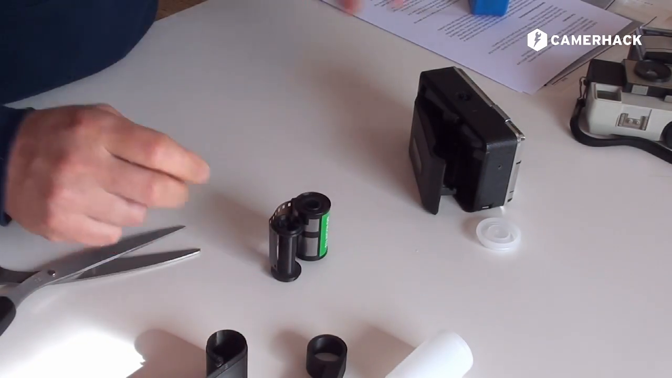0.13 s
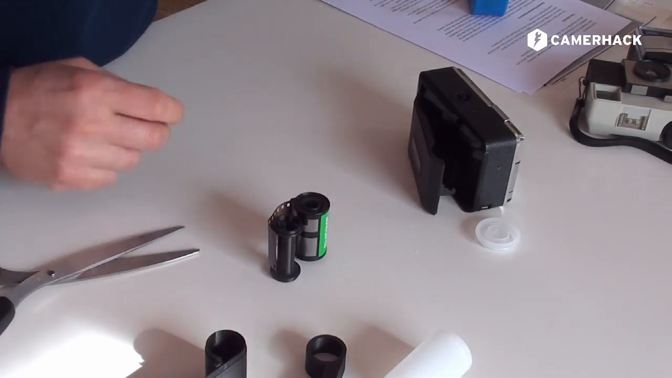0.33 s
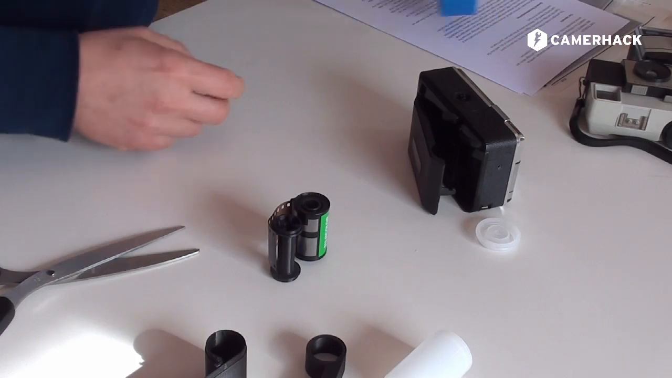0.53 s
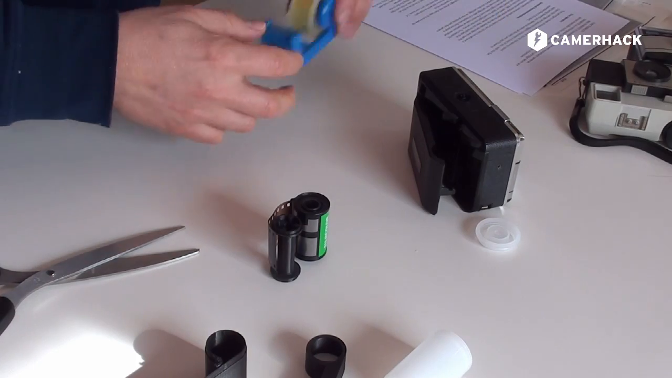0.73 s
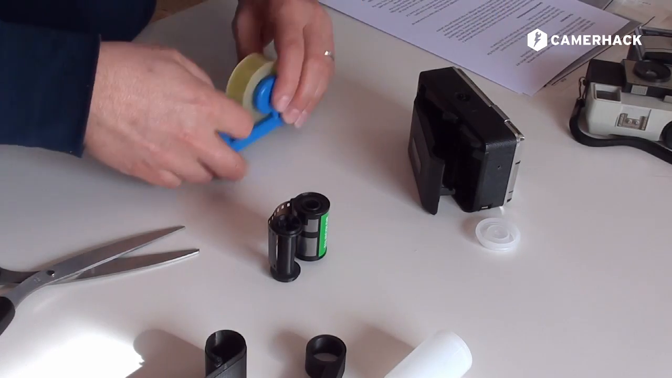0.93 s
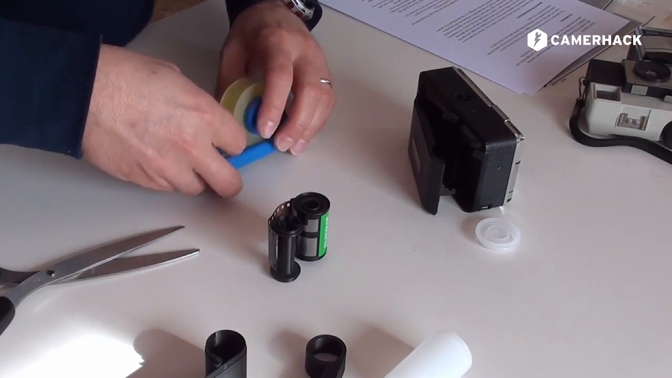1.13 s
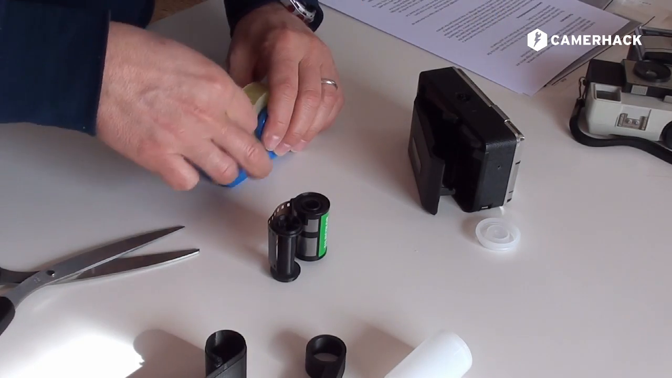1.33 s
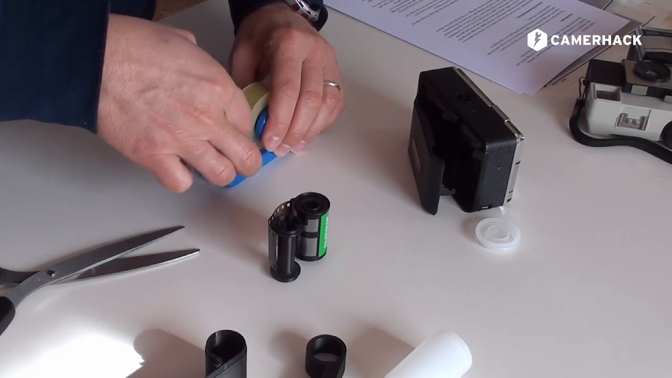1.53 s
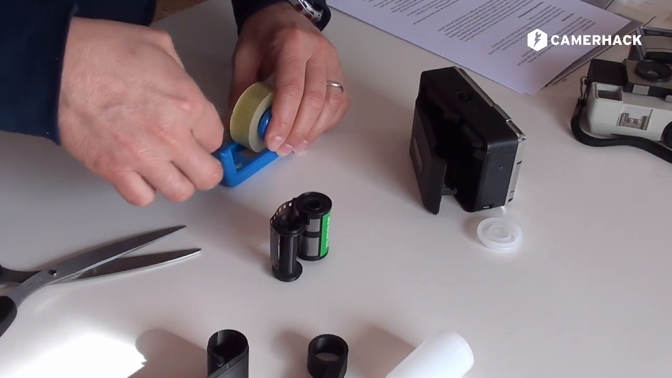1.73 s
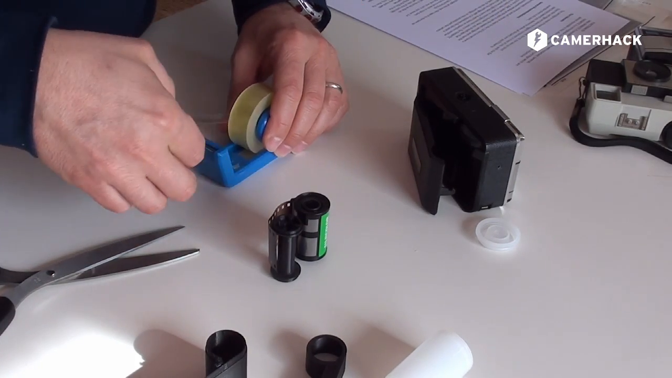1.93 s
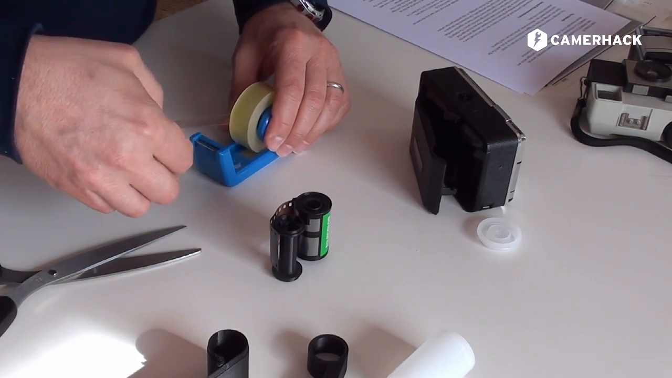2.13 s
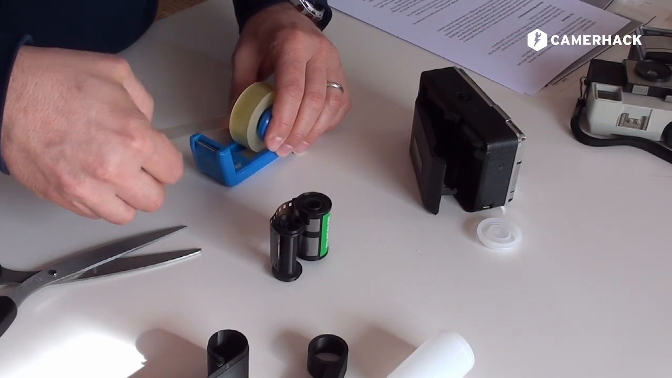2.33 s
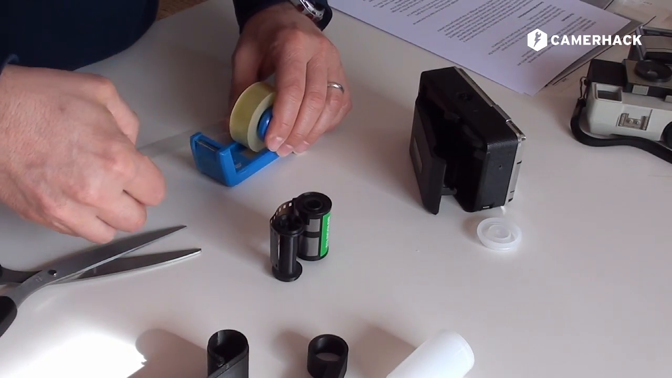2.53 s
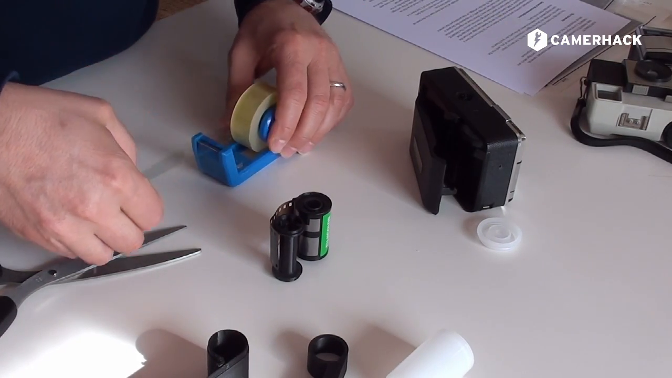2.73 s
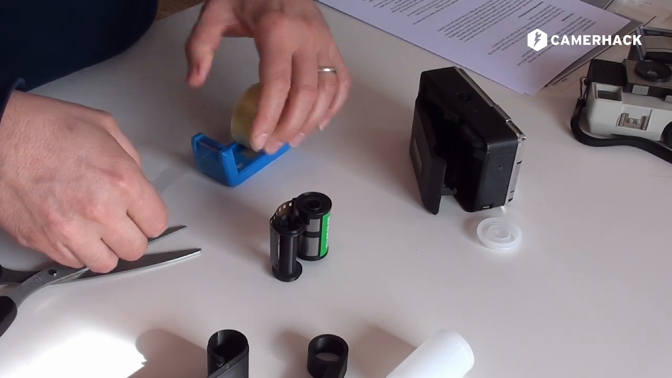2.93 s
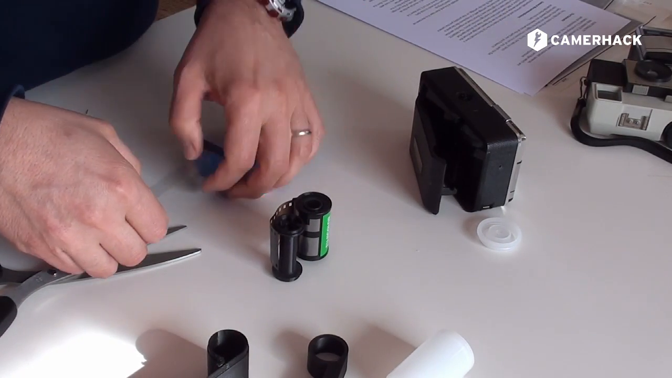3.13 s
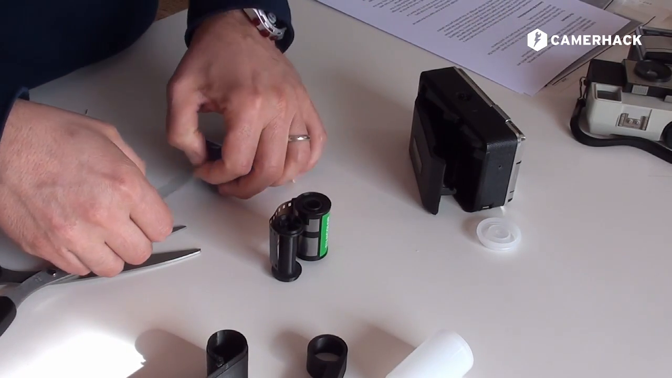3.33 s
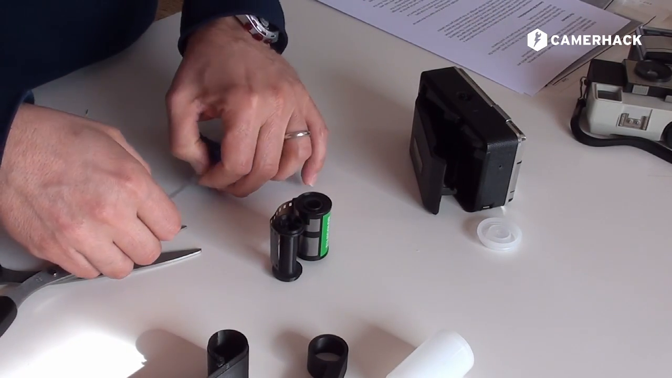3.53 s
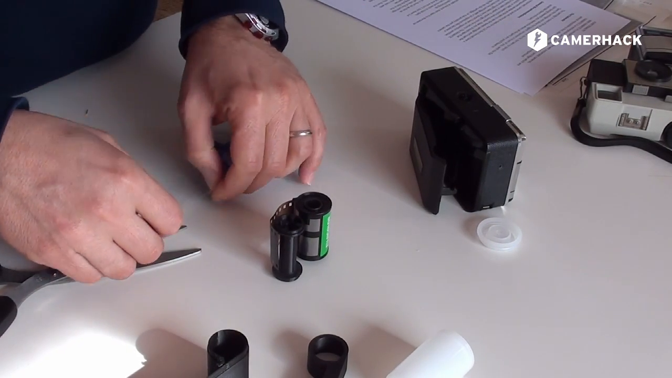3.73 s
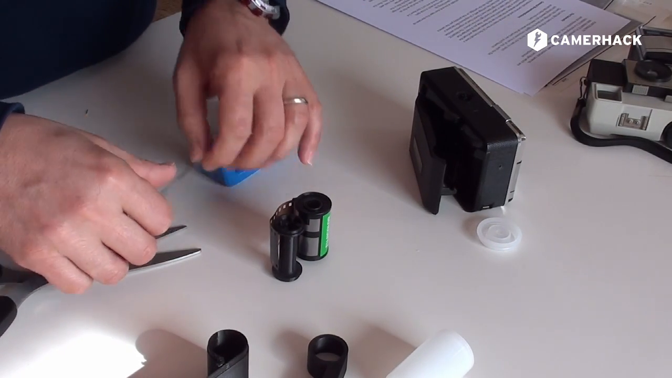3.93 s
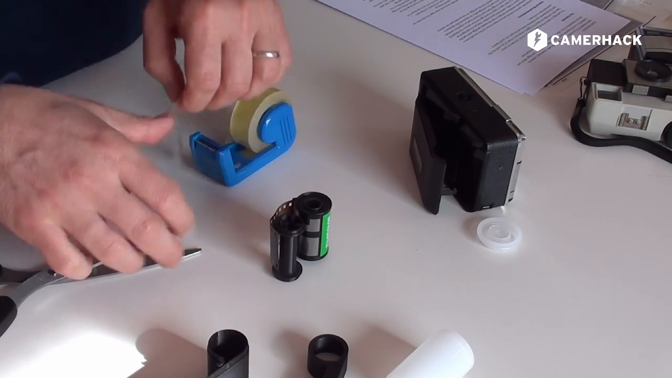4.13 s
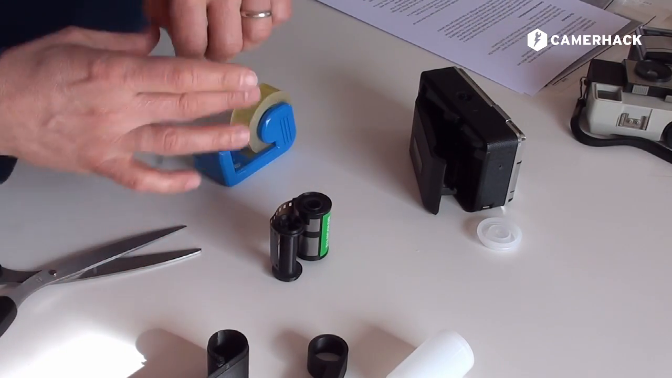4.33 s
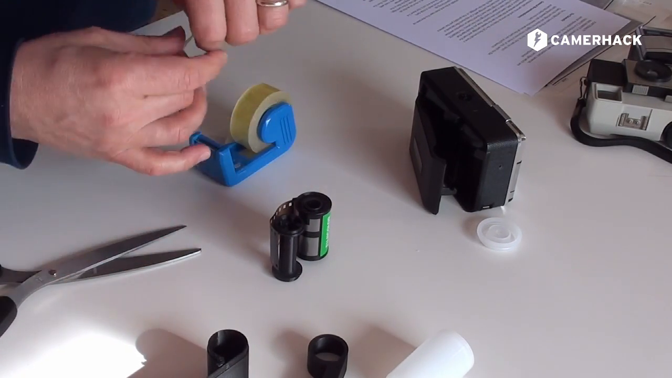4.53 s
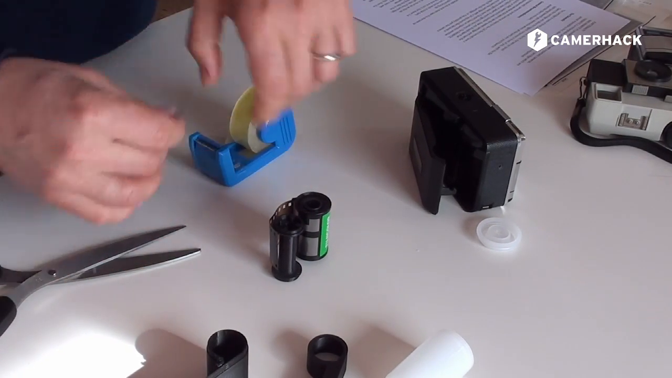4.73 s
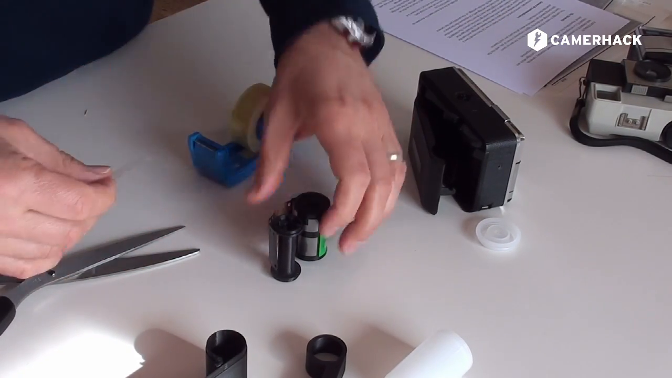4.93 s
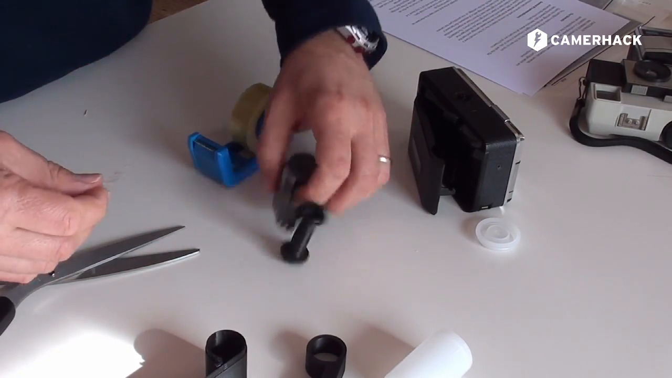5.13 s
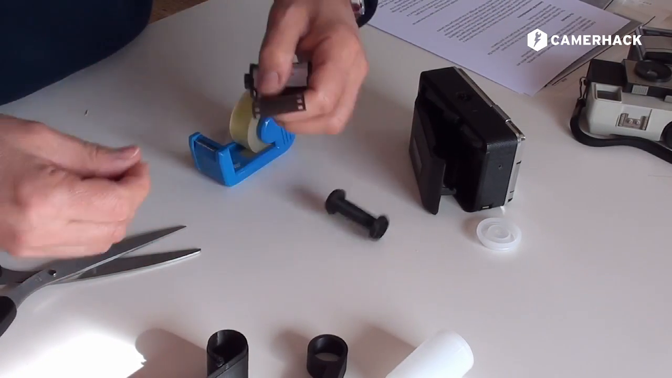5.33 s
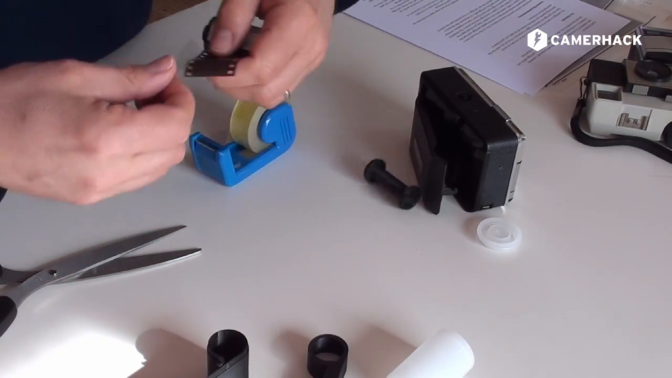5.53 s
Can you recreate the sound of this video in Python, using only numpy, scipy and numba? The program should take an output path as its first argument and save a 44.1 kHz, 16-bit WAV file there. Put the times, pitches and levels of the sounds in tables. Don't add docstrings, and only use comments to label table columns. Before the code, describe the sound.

Sticky tape is peeled from a small plastic dispenser in a bright, stuttering rasp, torn sharply, then a hollow plastic spool clatters onto the desk.

```python
import sys
import numpy as np
from scipy import signal
from scipy.fft import rfft, irfft
from scipy.io import wavfile
from numba import njit

SR = 44100
rng = np.random.default_rng(int(sys.argv[2]) if len(sys.argv) > 2 else 0)


def field_ratio(decibels):
    return 10 ** (np.asarray(decibels, dtype=float) / 20)


def output_pcm(signal):
    pcm = np.clip(np.atleast_2d(signal).T, -1, 1) * 32767
    wavfile.write(sys.argv[1], SR, np.round(pcm).astype(np.int16))


N = 246519
TIME = np.arange(N) / SR


@njit
def svf(x, hz, width):
    y, band, low = np.empty(len(x)), 0., 0.
    for i in range(len(x)):
        g, k = np.tan(np.pi * hz[i] / SR), width / hz[i]
        v = (band + g * (x[i] - low)) / (1 + g * (g + k))
        band, low, y[i] = 2 * v - band, low + 2 * g * v, k * v
    return y


def body(x, resonances, shift=1):
    out, power = 0, 0
    for k, (hz, width_hz, db) in enumerate(resonances):
        centre_hz = np.clip(hz * shift * np.ones(len(x)), 20, SR / 2.3)
        out = out + (-1) ** k * field_ratio(db) * svf(x + 1e-18, centre_hz, 1. * width_hz)
        power += field_ratio(db) ** 2 * np.pi * width_hz / SR
    return out / np.sqrt(power)


def crackle(count, scatter_db):
    excess = np.minimum(rng.exponential(size=count), 4)
    x = rng.standard_normal(count) * field_ratio(scatter_db * excess)
    return x / np.sqrt(np.mean(x ** 2))


def burst(hold_ms, fade_ms, scatter_db, count=512):
    t_ms = np.arange(count) / SR * 1000
    fade = np.exp(-np.maximum(t_ms - max(hold_ms, 0), 0) / fade_ms)
    rise = 1 - np.exp(-t_ms / 0.3)
    size = np.abs(crackle(count, scatter_db)) * fade * rise
    x = size * np.sign(rng.standard_normal(count))
    for _ in range(12):
        spectrum = rfft(x)
        flat = irfft(spectrum / (np.abs(spectrum) + 1e-12))
        x = size * np.sign(flat)
    return x


def add(track, s, piece):
    i = int(s * SR)
    track[i:i + len(piece)] += piece[:N - i]


def curves(at, rows):
    s, *columns = np.transpose(rows)
    return [np.interp(at, s, c) for c in columns]


def high_pass(x, order, hz):
    return signal.sosfilt(signal.butter(order, hz, "high", fs=SR, output="sos"), x)


# (frequency [Hz], density [dB per Hz])
FLOOR_COLOUR = [(15, -54), (25, -8), (80, -5), (190, 3.5), (240, -1), (516, -2), (1300, -6), (16000, -12.5)]


def floor():
    hz = np.fft.rfftfreq(N, 1 / SR) + 1
    table_hz, table_db = np.transpose(FLOOR_COLOUR)
    colour_db = np.interp(np.log(hz), np.log(table_hz), table_db)
    hiss = irfft(rfft(rng.standard_normal(N)) * field_ratio(colour_db), N)
    return hiss * field_ratio(-45.5) / np.sqrt(np.mean(hiss ** 2))


# (frequency [Hz], decay t60 [s], level [dB])
ROOM = [(127, 0.35, -34), (279, 0.62, 11.5), (564, 0.49, 8.5), (1010, 0.55, 6.5), (1870, 0.52, 10),
        (4000, 0.5, 10.5), (7800, 0.34, 1.5), (12000, 0.3, 1.5)]


def room(x):
    t = TIME[:SR]
    tail = 0
    table_hz, table_t60_s, table_db = np.transpose(ROOM)
    for hz in 127 * 2 ** np.arange(0, 7.1, .5):
        t60_s = np.interp(np.log(hz), np.log(table_hz), table_t60_s)
        db = np.interp(np.log(hz), np.log(table_hz), table_db) - 5.0
        decay = np.exp(-np.log(1000) * t / t60_s)
        band = body(crackle(len(t), 2.52), [(hz, 0.47 * hz, 0)]) * decay
        tail = tail + field_ratio(db) * np.sqrt(hz / t60_s / SR) * band
    early = 1 + 0.35 * np.exp(-t / 0.0032)
    arrival = np.clip((t - .001) / .002, 0, 1)
    return signal.fftconvolve(x, tail * early * arrival * np.sqrt(20 / SR))[:N]


def swell(s, db, rise_s, fall_s):
    slope = np.where(TIME < s, (s - TIME) / max(rise_s, .002), (TIME - s) / max(fall_s, .002))
    return field_ratio(db - 30 * slope)


# (peak time [s], level [dB], rise [s], fall [s], centre [Hz])
SLIDES = [(.442, -18.5, 0.029, 0.12, 1420), (.99, -30, 0.14, 0.015, 970), (1.17, -28.5, 0.095, 0.45, 685),
          (1.33, -27, 0.08, 0.017, 1140), (2.778, -30, 0.021, 0.18, 830), (3.138, -28.5, 0.028, 0.31, 795),
          (4.125, -43.5, 0.86, 0.091, 2600), (4.664, -35, 0.014, 0.082, 1760),
          (4.706, -33.5, 0.006, 0.078, 2370), (5.024, -21.5, 0.014, 0.13, 690),
          (5.06, -32, 0.044, 0.072, 790), (5.108, -15, 0.042, 0.028, 790), (5.126, -21, 0.049, 0.028, 1200)]
# (peak time [s], level [dB], rise [s], fall [s])
STROKES = [(0.442, -21.5, 0.069, 0.2), (.89, -34.5, .05, 0.48), (.995, -47, .2, .01), (1.122, -39, .01, .2),
           (1.33, -12, 0.13, 0.013), (1.36, -11.5, 0.033, 0.19), (5.217, -24, 0.042, 0.036),
           (2.835, -25.5, 0.066, 0.015), (3.146, -34, 0.082, 0.35), (3.75, -34.5, 0.53, 0.17),
           (3.99, -44, .1, 0.3), (4.137, -26.5, 0.36, 0.033), (4.698, -24, 0.064, 0.015),
           (4.708, -20, 0.006, 0.088), (5.128, -32, 0.16, .02)]
# (multiple of centre [ratio], width [Hz], level [dB])
SLIDE_COLOUR = [(1.01, 606, -2), (1.8, 860, -16)]
# (frequency [Hz], width [Hz], level [dB])
STROKE_COLOUR = [(5730, 1600, 9.9), (7800, 1240, 14), (11000, 16000, 2.2)]


def rubs():
    centre_hz = curves(TIME, SLIDES)[-1]
    slide_gain = sum(swell(*row[:-1]) for row in SLIDES)
    stroke_gain = sum(swell(*row) for row in STROKES)
    slides = slide_gain * body(crackle(N, 2.7), SLIDE_COLOUR, centre_hz)
    strokes = stroke_gain * body(crackle(N, 1.7), STROKE_COLOUR)
    return field_ratio(-7.5) * slides + field_ratio(-8.5) * strokes


# (time [s], level [dB], colour [Hz], length [ms])
TICKS = [(0.4443, -11, 3830, 5), (.9607, 3, 8050, 0.47), (0.972, -6, 7800, 0.78), (1.238, -7.5, 4500, 1.7),
         (1.256, -2.5, 3730, 1.2), (1.2547, -3, 9750, 2.5), (1.315, -2, 9000, 0.87),
         (1.3479, -6, 8000, 1.7), (1.353, 1, 9000, 5.6), (1.3108, -12, 7500, 2.2), (1.2959, -4, 7550, 1.2),
         (1.3193, 7, 7460, 1.7), (1.3284, 3, 7250, 0.57), (1.3377, 15.5, 8700, 3),
         (1.3917, 13.5, 6300, 0.6), (1.408, 2, 7300, 1.6), (1.3843, 6, 8600, 2), (1.2855, -12, 7500, 1.5),
         (1.272, -12, 11000, 2), (2.822, -22, 6000, 1.2), (3.142, -10.5, 8260, 2.2),
         (3.185, -12, 6740, 1.6), (3.3273, -8, 6340, 0.58), (3.16, -16, 7300, 1.4), (3.35, 5.5, 5300, 1.4),
         (3.356, 4, 5300, 1), (3.357, 12, 8600, 2), (3.4007, 13.5, 8000, 0.76), (3.4124, 6.5, 5300, 0.75),
         (3.4176, 20, 7950, 0.85), (3.897, -16.5, 7970, 2.1), (4.106, -2, 7700, 1), (4.13, 17, 8400, 0.32),
         (4.6657, -21, 7000, 2), (4.6711, -1.5, 8400, 1.4), (4.6787, -7, 7500, 1), (4.701, 1, 5100, 1.86),
         (4.702, -11.5, 2310, 3.2), (4.7035, 7, 9000, 3.4), (5.0891, -11, 8140, 3), (5.125, -10, 9000, 3),
         (5.1704, 0, 9050, 1.1), (5.1735, -7, 10500, 2.5), (5.1775, 7.5, 8360, 0.79),
         (5.185, 1.5, 6900, 1.2)]
# (time [s], level [dB])
CRINKLES = [(.643, -8.5), (5.105, -16), (5.131, -3), (3.311, -7), (3.827, -11), (3.9614, -6), (3.979, -4),
            (3.991, -3), (3.995, -2), (4.0075, -11), (4.0775, -11), (4.363, -11.5), (4.5203, -19)]
# (time [s], level [dB])
TAPS = [(.404, -8), (0.4342, -2), (0.4645, -11), (0.4676, -4.5), (0.4966, -3), (.699, -17.5),
        (0.9054, -19.5), (1.1152, -15.5), (1.243, -6), (5.121, -32), (5.128, -27), (1.3375, 9.5),
        (3.2133, -16), (3.3497, 0), (4.7006, -30)]
# (time [s], level [dB], length [ms])
SQUEAK = (5.022, -28.5, 28)
# (frequency [Hz], width [Hz], level [dB])
SQUEAK_TONES = [(2800, 260, 0), (7000, 500, -17), (8600, 500, -14), (11200, 500, -15)]


def dull_tap(crack):
    return -body(crack, [(1760, 2050, 0)])


def click(crack):
    return np.linalg.norm(crack) * (np.arange(len(crack)) == 0)


def ticks():
    near, far = np.zeros(N), np.zeros(N)
    fade_ms, scatter_db = .4, 0.3
    crinkles = [(s, db, 6300, 0.35) for s, db in CRINKLES]
    for s, db, hz, ms in TICKS + crinkles:
        crack = burst(ms, fade_ms, scatter_db)
        for track, x in (near, crack), (far, click(crack)):
            snap = body(x, [(hz, 0.42 * hz, 0), (8000, 6500, -8)])
            add(track, s, field_ratio(db - 11.5) * (snap + field_ratio(-23) * dull_tap(x)))
    for s, db in TAPS:
        crack = burst(3.46, fade_ms, scatter_db)
        add(near, s, field_ratio(db - 19.5) * dull_tap(crack))
        add(far, s, field_ratio(db - 12.0) * dull_tap(click(crack)))
    s, db, ms = SQUEAK
    squeak = field_ratio(db) * body(burst(ms, 0.6, 0.46, count=2048), SQUEAK_TONES)
    add(near, s, squeak)
    add(far, s, squeak)
    return near, far


# (time [s], body level [dB], pitch [ratio])
BOUNCES = [(5.246, 14, 1.01), (5.2539, -13, 1.04), (5.266, 5, .97), (5.274, 7.5, .96), (5.287, 8, 1.03),
           (5.297, 6, 1.08), (5.3467, 16, .94), (5.367, 6, 1.06), (5.394, 12, 1.01), (5.435, 10, .97),
           (5.455, 14, 1.03), (5.466, -9, 1.05), (5.4953, 11.5, .96), (5.517, 6, 1.02), (5.522, 11, 1.04),
           (5.5515, 9.5, .98), (5.584, 7, 1.01)]
# (time [s], level [dB])
RIM = [(5.2459, 3.5), (5.2553, -12), (5.2626, -15), (5.272, -1), (5.2871, -21), (5.345, -15), (5.3673, 1),
       (5.3837, -7), (5.3928, -3), (5.435, -4), (5.455, 3.5), (5.4625, -7), (5.4946, -17), (5.5156, -3),
       (5.521, -21), (5.536, -18), (5.551, -1.5), (5.5673, -13), (5.5843, -4)]
# (time [s], level [dB])
ROLL = [
    (5.244, -36),
    (5.246, -2.5),
    (5.3, -5.5),
    (5.345, -12),
    (5.45, -12.5),
    (5.59, -14.5),
]
# (frequency [Hz], width [Hz], level [dB])
SPOOL = [(420, 1700, -6.5), (905, 250, 6), (1280, 610, -1), (1780, 460, 4.5), (2290, 610, -0.4),
         (3100, 1350, -1), (3940, 1220, -3.5), (5300, 1400, -14.5)]
# (frequency [Hz], width [Hz], level [dB])
SPOOL_EDGE = [(7400, 1800, 5), (9000, 400, 3), (11000, 700, 1), (12500, 4100, -14)]


def spool():
    roll_s, roll_db = np.transpose(ROLL)
    roll_gain = field_ratio(np.interp(TIME, roll_s, roll_db, left=-200, right=-200))
    blows, rim = field_ratio(-2.5) * roll_gain * crackle(N, 1.1), np.zeros(N)
    for s, db, _ in BOUNCES:
        add(blows, s, field_ratio(db - 5.5) * burst(1.3, 1.4, 0.092))
    for s, db in RIM:
        add(rim, s, field_ratio(db - 3.0) * burst(0.2, 0.73, 0.35))
    pitch = curves(TIME, BOUNCES)[-1]
    hollow = body(body(blows, SPOOL, pitch), [(1780, 12900, 0)])
    hiss = body(blows, [(7700, 2300, 0)])
    return field_ratio(-2.0) * hollow + body(rim, SPOOL_EDGE) + field_ratio(-21.0) * hiss


def desk(s, db, modes):
    out, push = 0, np.hanning(max(int(SR / 1000), 3))
    uneven_db = 2.5 * rng.standard_normal((len(modes), len(s)))
    for (hz, mode_db, t60_s), chance_db in zip(modes, uneven_db):
        train = np.zeros(N)
        np.add.at(train, (s * SR).astype(int), field_ratio(db + mode_db + chance_db))
        pole = np.exp(2j * np.pi * hz / SR - np.log(1000) / (t60_s * SR))
        out = out + signal.lfilter([1], [1, -pole], train).imag
    return signal.lfilter(push / push.sum(), [1], out)


# (time [s], main modes [dB], lowest modes [dB], upper modes [dB])
KNOCKS = [(0.403, -24.5, -27, -27), (0.905, -62, -56, -37), (0.971, -30, -34, -30.5),
          (1.115, -18.5, -21, -11), (1.149, -21, -39, -22), (1.183, -31, -16, -33), (1.205, -6, -53, -15.5),
          (1.316, -18, -49, -17.5), (1.39, -20.5, -19.5, -20), (2.777, -24, -43, -24.5),
          (2.799, -37, -28, -31), (3.144, -27, -27, -20), (3.162, -26, -53, -24), (3.183, -28, -56, -23),
          (3.213, -20, -13.5, -19.5), (3.349, -21.5, -27, -18), (3.414, -19, -40, -16.5),
          (3.46, -43, -14, -34), (3.478, -10.5, -15.5, -18), (3.49, -11.5, -14, -20),
          (3.574, -4.5, -40, -9), (3.609, -49, -14.5, -24.5), (3.74, -27, -36, -25.5),
          (3.803, -31, -44, -31), (3.927, -31.5, -20.5, -28), (3.958, -52, -21, -42),
          (4.067, -60, -27.5, -57), (4.702, -48, -62, -41), (5.039, -29.5, -57, -20.5),
          (5.074, -45, -48, -32), (5.104, -27, -32, -27), (5.123, -33, -27.5, -21.5)]
# (time [s], middle modes [dB], upper modes [dB])
GRIP = [(1.5, -11, -11.5), (1.6, 8.5, -13.5), (1.73, -2.5, -9), (1.85, -4.5, -11.5), (2.02, -4.5, -9),
        (2.15, -4.5, -11), (2.3, -7.7, -13), (2.55, 5, -11.5), (3.5, 4.5, -9), (5.3, 11.5, -12)]
# (frequency [Hz], level [dB], decay t60 [s])
DESK_LOW = [(119, -16.5, 0.17), (162, -30, 0.44), (170.5, -15, 0.41), (185.3, -28, 0.6)]
# (frequency [Hz], level [dB], decay t60 [s])
DESK_MID = [(253.7, -29, 0.47), (275.6, -13.5, 0.24), (312.3, -13, 0.16)]
# (frequency [Hz], level [dB], decay t60 [s])
DESK_MAIN = [(380.6, -7, 0.12), (401.7, -13, 0.12), (398, -24.5, .06)]
# (frequency [Hz], width [Hz], level [dB])
DESK_TOP = [(607, 260, 11.5), (713, 80, 15.5), (860, 138, 6.5), (1180, 173, 7.5), (1440, 320, 4),
            (2050, 700, -8.5)]


def thumps(slip_s, slip_jolt_db):
    bounce_s, bounce_db, _ = np.transpose(BOUNCES)
    knock_s, main_db, low_db, top_db = np.transpose(KNOCKS)
    jolt_s = np.r_[slip_s, bounce_s]
    jolt_db = np.r_[slip_jolt_db, bounce_db - 34.5]
    grip_mid_db, grip_top_db = curves(jolt_s, GRIP)
    s = np.r_[knock_s, jolt_s]
    thud = np.zeros(N)
    for at, db in zip(s, np.r_[top_db - 3, jolt_db + grip_top_db]):
        add(thud, at, field_ratio(db) * burst(2.2, 11.0, 1.0, count=2048))
    mid = desk(s, np.r_[top_db + 4.5, jolt_db + grip_mid_db], DESK_MID)
    main = desk(s, np.r_[main_db + 4, jolt_db], DESK_MAIN)
    low = desk(s, np.r_[low_db + 3, jolt_db - 15], DESK_LOW)
    return high_pass(mid + main + body(thud, DESK_TOP), 6, 222) + low


# (time [s], crack [dB], length [ms])
RUSH = [(1.4844, 0.8, 0.9), (1.5022, 1.9, 1.0), (1.5184, -8.7, 1.5), (1.5264, -0.5, 1.4),
        (1.5339, 1.1, 2.9), (1.5433, 0.7, 2.5), (1.5502, -6.7, 2.4), (1.5558, -0.7, 3.8),
        (1.5664, -1.7, 1.1), (1.5732, 0.4, 1.1), (1.583, 1.8, 3.2), (1.5924, 1.6, 0.7), (1.5998, 0.9, 1.5),
        (1.605, -1.3, 0.6), (1.6076, -1.4, 2.6), (1.6131, -0.3, 0.5), (1.6173, 0.1, 1.7),
        (1.6202, 3.2, 0.7), (1.6275, 0.1, 0.7), (1.6354, 1.9, 2.5), (1.6395, 0.5, 0.6), (1.6427, 1.6, 1.4),
        (1.647, -0.5, 0.5), (1.6504, 0.4, 2.3), (1.6544, 2.4, 1.4), (1.6631, 1.7, 1.9), (1.6744, 2.3, 2.5),
        (1.6807, 2.6, 1.0), (1.6843, 1.3, 3.0), (1.69, 1.2, 0.5), (1.6927, 2.8, 2.7), (1.7001, 1.0, 0.6),
        (1.7122, 2.2, 1.3), (1.7186, 2.1, 1.3), (1.7252, 2.2, 1.2), (1.7288, 0.7, 1.7), (1.7373, 2.2, 0.9),
        (1.7405, 1.1, 0.6), (1.7462, 2.7, 1.3), (1.7536, 1.4, 3.5), (1.7621, 3.4, 1.2), (1.773, 1.9, 1.1)]
# (time [s], jolt [dB])
JOLT = [(1.48, -10), (1.54, -12.5), (1.6, -15), (1.66, -15), (1.7, -6.5), (1.78, -9.5)]
# (time [s], crack [dB], length [ms], jolt [dB])
SLIPS = [(1.7852, 6, 1.4, 1.3), (1.8, 1, 3.1, -5), (1.8129, 2, 2.3, -5), (1.8251, 6.5, 2, -14),
         (1.85, 10.5, 0.72, -6), (1.871, 5.5, 2.8, -2.5), (1.8939, 3, 2.9, -3), (1.9173, 5.4, 2.2, -2),
         (1.9347, 5.5, 5.2, -4), (1.9557, -5, 3.5, -11), (1.9738, 7, 4.6, -9.5), (1.9958, 6, 2.77, 0.5),
         (2.016, 7.5, 2.8, -1), (2.0333, 3.5, 3.56, 1.3), (2.0986, 10, 1.54, -0.5), (2.1158, 1.5, 4.8, -5),
         (2.1349, 9.5, 2.53, -2), (2.1494, 7, 2.4, -21), (2.1671, 9.5, 2.4, -3.5), (2.2531, 5, 5.2, -11),
         (2.2687, -6, 3.3, -19), (2.2821, 8.5, 3.06, -3), (2.3019, 8.5, 2.07, -6), (2.3242, 7.5, 3.8, -7.5),
         (2.3447, 3.5, 2.8, -2), (2.3608, 9, 4.1, -8), (2.381, 8.5, 3.75, -7), (2.397, 4.8, 4.24, -4.5),
         (2.4102, 5.5, 3.36, -12.5), (2.4348, 9.5, 3, -20), (2.4586, 7.5, 3.95, -5.5),
         (2.4771, 10.5, 2.4, -30), (2.4939, -17, 3, -12), (2.5032, 5, 4.2, -12.5), (2.5307, 9, 2.8, -25.8),
         (2.5477, -5, 0.72, -14.5), (2.5588, 11, 2.24, -19)]
# (time [s], crack [dB], length [ms], jolt [dB])
TEAR = [
    (3.4537, 5, 5.6, -9),
    (3.4655, 12, 1.3, -14),
    (3.4715, 4.5, 1.77, -10.5),
    (3.4769, 4.5, 1.53, -16),
    (3.4879, 11, 0.51, -8),
    (3.5741, 6.5, 1.6, -6),
]


def slips():
    rush = [(s, db + 0.5, ms, np.interp(s, *np.transpose(JOLT))) for s, db, ms in RUSH]
    s, crack_db, ms, jolt_db = np.transpose(rush + list(SLIPS) + list(TEAR))
    scatter_db = 2 * rng.standard_normal(len(s)) * (s <= RUSH[-1][0])
    return s, crack_db, ms, jolt_db + scatter_db


# (time [s], ring pitch [ratio], drum pitch [Hz])
TAPE_PITCH = [(1.48, 1.27, 2000), (1.55, 1.23, 1500), (1.62, 1.16, 1000), (1.68, 1.11, 850),
              (1.77, .99, 850), (2.0, 1.03, 800), (2.6, .95, 950), (3.4, .86, 1050)]
# (time [s], drum [dB], share sent to the walls [dB], ring of the free tape [dB])
TAPE_SPAN = [
    (1.48, 10.5, -4, 5.5),
    (1.55, 4, -1, -4.5),
    (1.62, -3, 2.5, -0.5),
    (1.7, 5.5, 0, -1.5),
    (1.8, -6.5, -0.5, -3),
    (2.001, 5.5, -1.5, -8),
    (2.2, -4.5, -3.5, -7.5),
    (2.56, -24, -1.4, -22),
    (3.401, -1, -2.5, -9),
]
# (frequency [Hz], width [Hz], level [dB])
TAPE_RING = [(6300, 1300, 0), (10300, 1500, 0)]
# (frequency [Hz], width [Hz], level [dB])
TAPE_WIDE = [(3280, 5400, -2), (4550, 500, -16), (7300, 8100, 7.5), (11000, 9200, 5)]
# (frequency [Hz], width [Hz], level [dB])
BLADE = [(3360, 4700, -3), (5630, 460, 12), (7700, 1300, 6), (10100, 1600, 3.5), (13600, 4200, -6)]
# (frequency [Hz], width [Hz], level [dB])
TAPE_FAR = [(2570, 6800, -5), (4630, 690, 4), (7800, 3200, 3.5), (12000, 9400, -3)]


def tape(slip_s, crack_db, slip_ms):
    cracks = np.zeros(N)
    for s, db, ms in zip(slip_s, crack_db, slip_ms):
        add(cracks, s, field_ratio(db - 9.0) * burst(ms, 0.74, 1.0))
    shift, drum_hz = curves(TIME, TAPE_PITCH)
    drum_db, far_db, ring_db = curves(TIME, TAPE_SPAN)
    drum = field_ratio(drum_db - 12) * body(cracks, [(0.95, 170, 0)], drum_hz)
    ring = field_ratio(ring_db) * body(cracks, TAPE_RING, shift) + drum
    torn = TIME >= TEAR[0][0] - .01
    near = ring + body(cracks * ~torn, TAPE_WIDE) + body(cracks * torn, BLADE)
    far = field_ratio(far_db) * (ring + field_ratio(0.97) * body(cracks, TAPE_FAR))
    return near, far


def scene():
    slip_s, crack_db, slip_ms, jolt_db = slips()
    snaps, snaps_far = ticks()
    small = rubs() + spool()
    arrest_s = slip_s + 0.76 * slip_ms / 1000
    wood = thumps(arrest_s, jolt_db)
    peel, peel_far = tape(slip_s, crack_db, slip_ms)
    far = field_ratio(-5.5) * (peel_far + field_ratio(-6) * snaps_far + small) + field_ratio(-10.5) * wood
    near = peel + snaps + small + wood + room(far)
    return (high_pass(near, 4, 150) + floor())[None]


def band_limit(x):
    return signal.sosfilt(signal.butter(12, 16000, fs=SR, output="sos"), x)


def record(dry):
    ceiling, knee = .97, 8
    dry = signal.sosfilt(signal.ellip(8, .2, 50, 15800, fs=SR, output="sos"), dry)
    mix = dry / (1 + np.abs(dry / ceiling) ** knee) ** (1 / knee)
    return band_limit(mix)


dry = scene()
out = record(dry)
output_pcm(out)
```